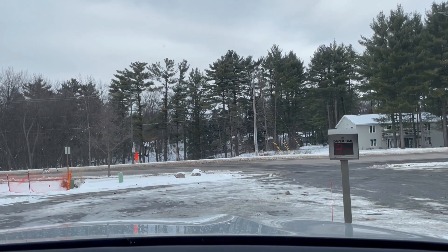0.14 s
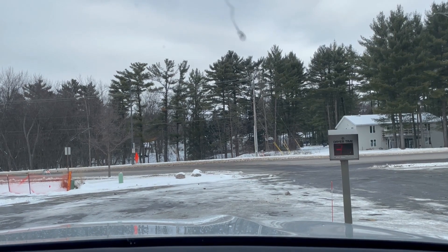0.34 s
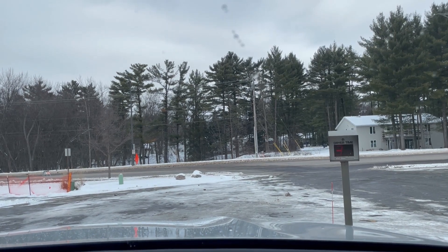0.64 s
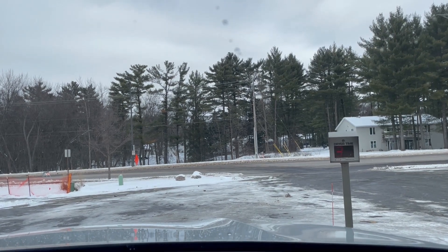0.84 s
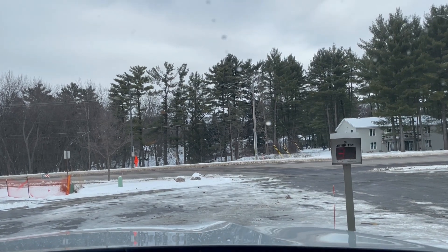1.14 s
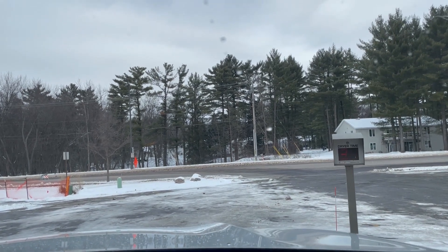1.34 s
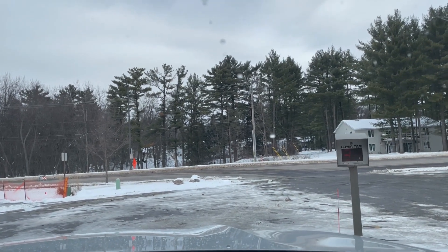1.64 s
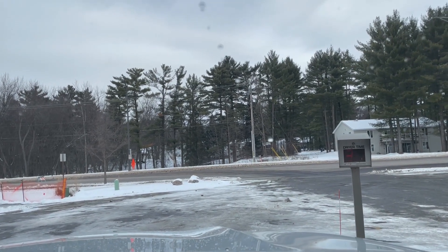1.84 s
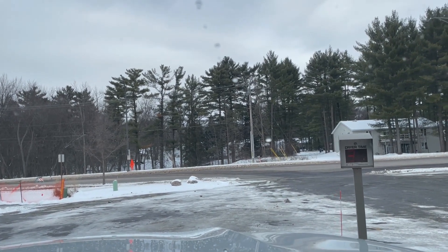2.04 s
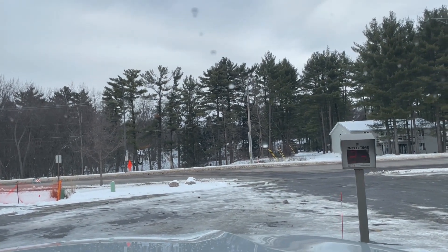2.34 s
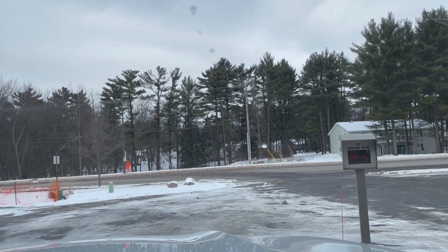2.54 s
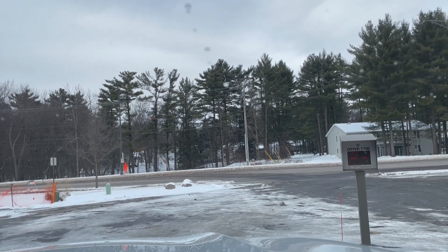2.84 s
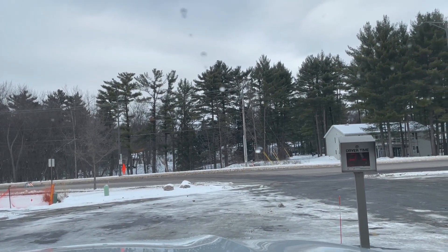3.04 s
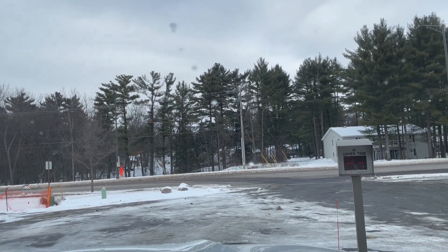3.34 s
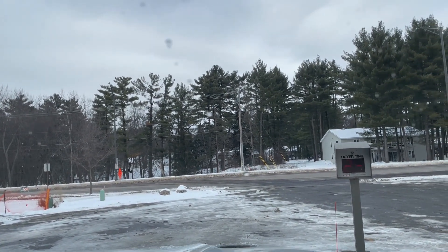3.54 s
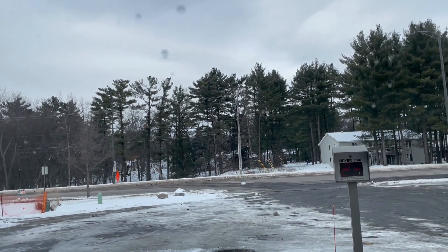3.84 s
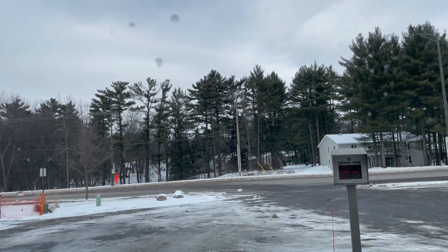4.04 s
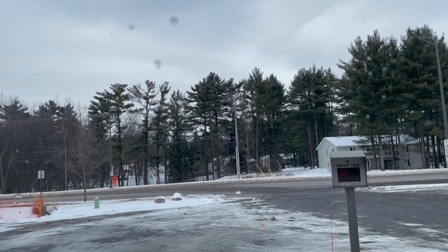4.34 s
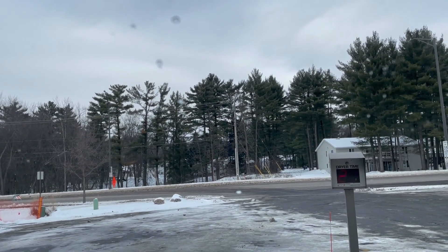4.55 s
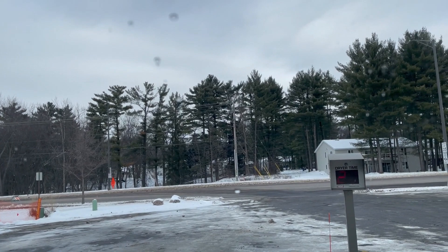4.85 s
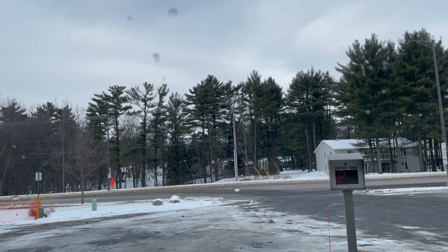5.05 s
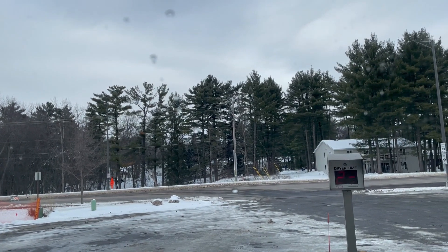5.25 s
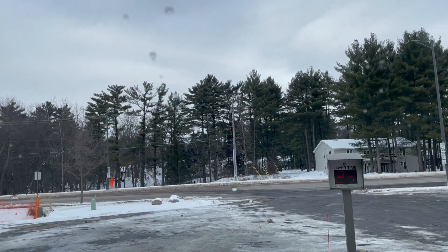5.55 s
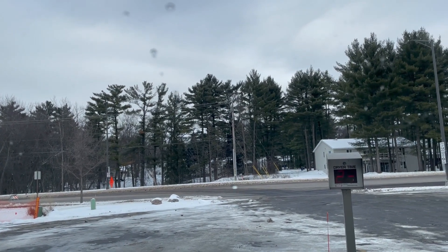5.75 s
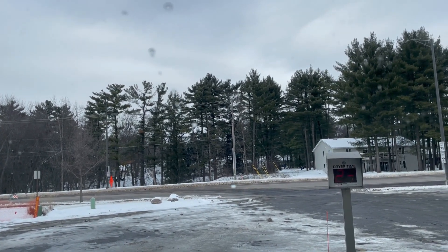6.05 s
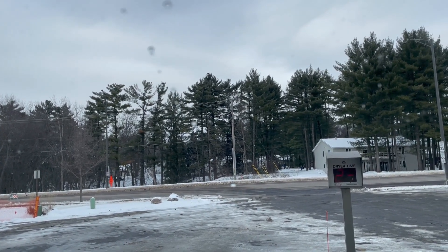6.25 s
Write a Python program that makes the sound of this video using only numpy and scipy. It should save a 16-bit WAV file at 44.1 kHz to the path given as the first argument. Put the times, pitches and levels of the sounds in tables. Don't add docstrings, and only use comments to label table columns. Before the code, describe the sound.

Inside a closed car, powerful dryer blowers pound the body panels into a continuous deep boom, while muffled air roars through roof and glass. The fans' blades sing faintly, wavering and swelling. Fine nylon sleeve swishes come and go close to the phone microphone. The blast is strongest in the first couple of seconds, then eases slightly but never stops.

```python
import sys
import numpy as np
from scipy import signal
from scipy.fft import rfft, irfft, dct, next_fast_len
from scipy.io import wavfile
from scipy.ndimage import uniform_filter1d

SR = 44100
rng = np.random.default_rng(int(sys.argv[2]) if len(sys.argv) > 2 else 0)


def digitize_waveform(pressure):
    field = np.atleast_2d(pressure).T
    bounded = np.clip(field, -1, 1)
    quanta = np.round(bounded * 32767).astype(np.int16)
    wavfile.write(sys.argv[1], SR, quanta)


def volts(x):
    e = np.asarray(x, float) / 20
    return 10 ** e


N = 282681
SIZE = next_fast_len(N)
HZ = np.arange(SIZE // 2 + 1) * SR / SIZE + 1e-3

# time in seconds, level in dB.
BLAST = [(0, -16), (.25, -15.5), (.5, -15), (.8, -15.5), (1.2, -13), (1.7, -14.5), (2.1, -15.5),
         (2.45, -16), (2.66, -18.5), (2.95, -15.5), (3.3, -16.5), (3.7, -16.5), (4.1, -16.5), (4.7, -17),
         (5.3, -16.5), (5.85, -18), (6.02, -16.5), (6.41, -19)]
LAYER_EDGES_HZ = [85, 230, 1200]
PUSH_SHARE = [1.3, 0.94, 0.22, .1]
BUFFET_DB = [0.54, .6, 0.54, .5]
STIFFENING = [0.44, 0.22, 0.42, 0.046]
# frequency in Hz, density in dB per Hz.
PANELS = [(13, -36), (22, -10.5), (49, 1), (107, -2.5), (195, -9), (281, -21.5), (416, -18.5), (560, -30.5),
          (730, -60), (1230, -120)]
# frequency in Hz, density in dB per Hz.
GLASS = [(430, -30.5), (560, -6), (700, -4), (976, -11.5), (1600, -18.5), (2500, -20), (3400, -26),
         (5300, -33), (5600, -37.5), (7200, -41), (8600, -64), (10000, -52.5), (12200, -48), (14000, -55.5),
         (15700, -65)]
# frequency in Hz, density in dB per Hz.
PANELS_SIDE = [(13, -42), (22, -13), (42, 0), (65, -3), (248, -1.5), (288, -2.5), (330, -1), (489, -6.5),
               (530, -8.5), (560, -10), (730, -33.5), (1230, -120)]
# frequency in Hz, density in dB per Hz.
GLASS_SIDE = [(430, -31), (560, -10.5), (640, -1), (853, -13.5), (1300, -18), (1500, -18), (2230, -29),
              (2720, -28.5), (4300, -37.5), (5300, -41.5), (5500, -43.5), (6700, -46.5), (8600, -45.5),
              (11700, -56), (14000, -67)]
# frequency in Hz, width in Hz, common lift in dB, difference lift in dB.
RESONANCES = [(49.4, 18, 3.5, 1), (72.4, 13, 2, -0.5), (89.6, 8.6, -2, 2.5), (108, 20, 2, 4.5),
              (173.6, 6.6, -1.5, 0.5), (193, 16, 1.5, -1), (321, 24, 3.5, -2), (417.7, 34, 4, -0.5),
              (495, 31, 4, 2.5), (534, 21, 2.5, -3.5), (660, 32, 4, 0.5), (680, 30, -2.5, 0.5),
              (772, 40, 3.5, 0.5), (870, 40, 2.5, -0.5), (1270, 51, 4.5, 1.5), (1420, 73, 5.5, -3),
              (1843, 400, 4, 1), (2500, 88, 0, 2), (2750, 200, 1, -2), (3200, 310, 2, 3),
              (5170, 300, 1, 4.5), (5550, 200, -2.5, -0.5)]
# frequency in Hz, in-step part from -1 to 1, quarter-turn part from -1 to 1.
PORT_LINK = [(60, .1, .0), (180, .05, .05), (400, 0.25, .1), (800, 0.21, -.1), (1600, 0.041, -.15),
             (2600, .25, .3), (4600, .45, .42), (5200, .45, .25), (5800, .2, -.35), (7500, .15, -.4),
             (8600, .02, .0), (9800, -.03, .7), (13000, -.02, .75)]
BLADE_TONES = {1: (-51, -50.5, 2.5), 2: (-45, -42.5, 4), 4: (-65, -59.5, 6)}
# peak in seconds, peak level in dB, rise and fall in seconds.
SONG = [(0.28, -38.5, .12), (.5, -39.5, 0.048), (0.91, -40.5, 0.048), (1.25, -45, 0.11), (1.75, -42.5, .35),
        (2.2, -46.5, .3), (2.55, -39, 0.11), (2.9, -44.5, 0.13), (3.96, -46, .3), (4.75, -45.5, .3),
        (5.23, -38, 0.16), (5.6, -44.5, .15), (6.09, -43.5, 0.035), (6.41, -46, 0.042)]
# peak in seconds, peak level in dB, rise in seconds, fall in seconds.
STROKES = [(0.27, -57, .25, .28), (1.4, -67.5, 1.1, 0.83), (3.01, -60, .03, .08), (3.08, -60.5, .04, .04),
           (3.18, -54.5, .05, .05), (3.28, -58, 0.07, 0.14), (3.4, -68, .1, 0.4), (4.55, -69, .35, 0.24),
           (4.69, -59, .11, 0.15), (4.91, -60, 0.058, 0.2), (5.23, -56.5, 0.1, 0.11),
           (5.34, -55.5, 0.12, .1), (5.72, -62, 0.27, .1), (5.98, -59, 0.25, 0.13), (6.1, -67, .1, .25)]
# frequency in Hz, density in dB per Hz.
NYLON = [(2000, -25), (3400, -2), (5000, -0.5), (6900, -2.5), (7700, -8), (8600, -12), (9600, -5.5),
         (11000, -3), (12400, -1.5), (13800, -2.5), (15200, -6), (16000, -17.5)]
# frequency in Hz, density in dB per Hz.
NYLON_SIDE = [(2000, -21.5), (3400, -2.5), (5000, -6.5), (6900, -6), (8600, -0.5), (10300, -4.5),
              (12400, -8.5), (14000, -14), (16000, -23.5)]
# frequency in Hz, common level in dB,
# difference level in dB.
FAINTEST = [(1000, -64, -70.5), (3000, -72, -71), (5500, -68, -66.5), (6600, -65.5, -67.5),
            (7600, -62, -70), (8000, -61.5, -68.5), (9600, -61, -65), (9800, -66, -67.5),
            (12000, -69.5, -64.5), (13100, -66.5, -53.5), (14900, -61, -40), (15700, -59, -40)]
# frequency in Hz, extra level in dB needed to be kept.
STARVED = [(7200, 0), (7900, 8), (9300, 7.5), (10000, 3), (10700, -2), (14100, -1), (14800, 4.5),
           (15500, 5)]

PANELS_DB, GLASS_DB = -16.5, -40
PANELS_SIDE_DB, GLASS_SIDE_DB = -32.5, -36.5
BUFFETS_PER_S = 12
BLADE_HZ, SONG_REST_DB, SONG_USUAL_DB = 308.3, -53.5, -48
WHINE_HZ, WHINE_DB = 12048, -82
SLEEVE_DB, SLEEVE_SIDE_DB, SLEEVE_REST_DB = 3.5, 4.5, -76
BODY_HZ, RUB_BODY_DB = 7600, -2
ROUNDNESS = 1.7
LOW_CUT_HZ = 33.7
HOP, GRID = 1024, 250
LOST_COMMON_HZ, LOST_SIDE_HZ = (8270, 8960), (13090, 22050)
BAND_DROP_DB, STARVE_JITTER_DB = -7, 2.5
KEEP_JITTER_DB, KEEP_FOLLOWS = 5.5, 0.29


def shape(table):
    hz, db = np.transpose(table)
    gain = volts(np.interp(np.log(HZ), np.log(hz), db, left=-200, right=-200))
    return gain / np.sqrt(np.mean(gain ** 2))


def walk(rate):
    k = int(SR / rate)
    steps = np.repeat(rng.standard_normal(N // k + 1), k)
    return 1.3 * uniform_filter1d(uniform_filter1d(steps, k), k)[:N]


def swells_db(table, rest_db):
    t = np.arange(N) / SR
    power = volts(2 * rest_db)
    for peak_s, peak_db, *lengths in table:
        before = (peak_s - t) / max(lengths[0], 1e-3)
        after = (t - peak_s) / max(lengths[-1], 1e-3)
        away = np.where(t < peak_s, before, after)
        power = power + volts(2 * (peak_db - 10 * away ** ROUNDNESS))
    return 10 * np.log10(power)


def ports(common_gain, differ_gain, envelope=1):
    hz, in_step, quarter = np.transpose(PORT_LINK)
    link = np.interp(np.log(HZ), np.log(hz), in_step + 1j * quarter)
    first, second = (rfft(envelope * rng.standard_normal(N), SIZE) for _ in range(2))
    free = np.sqrt(np.clip(1 - abs(link) ** 2, 0, 1))
    common = first * common_gain
    differ = (link * first + free * second) * differ_gain
    return np.array([common + differ, common - differ])


def cabin(column):
    return volts(sum(row[column] / (1 + (2 * (HZ - row[0]) / row[1]) ** 2) for row in RESONANCES))


def jets():
    through = np.hypot(volts(PANELS_DB) * shape(PANELS), volts(GLASS_DB) * shape(GLASS))
    through_side = np.hypot(volts(PANELS_SIDE_DB) * shape(PANELS_SIDE), volts(GLASS_SIDE_DB) * shape(GLASS_SIDE))
    air = ports(cabin(column=2) * through, cabin(column=3) * through_side)
    push = np.interp(np.arange(N) / SR, *np.transpose(BLAST))
    push = push - push.mean()
    swells = [share * push + depth_db * walk(BUFFETS_PER_S) for share, depth_db in zip(PUSH_SHARE, BUFFET_DB)]
    place = 2 * np.log2(HZ / 20)
    out = 0
    for k in range(21):
        layer = np.searchsorted(LAYER_EDGES_HZ, 20 * 2 ** (k / 2))
        window = np.cos(np.pi / 2 * np.clip(place - k, -1, 1)) ** 2
        band = irfft(air * window, SIZE)[:, :N]
        swing = uniform_filter1d(np.sum(band ** 2, axis=0), int(0.065 * SR))
        even = (swing / swing.mean() + .05) ** (-STIFFENING[layer] / 2)
        flutter_db = .5 * walk(9) + .5 * walk(2.51)
        out = out + volts(swells[layer] + flutter_db) * even * band
    return out


def blades():
    out = 0
    for multiple, (common_db, differ_db, spread_hz) in BLADE_TONES.items():
        for fan, share in ((-1, 0.2), (0, 0.97), (1.0, 0.51)):
            tone_hz = multiple * BLADE_HZ + spread_hz * (fan + 0.351 * walk(7))
            phase = 2 * np.pi * np.cumsum(tone_hz) / SR
            start = rng.uniform(0, 2 * np.pi, 2)
            common = volts(common_db + 0.84 * walk(9.6)) * np.sin(phase + start[0])
            differ = volts(differ_db + 3 * walk(4)) * np.sin(phase + start[1])
            out = out + share * np.array([common + differ, common - differ])
    return out * volts(swells_db(SONG, SONG_REST_DB) - SONG_USUAL_DB)


def electronics():
    phase = 2 * np.pi * np.cumsum(WHINE_HZ + 4 * walk(15)) / SR
    whine = volts(WHINE_DB + 1.5 * walk(8)) * np.sin(phase)
    return whine * np.array([[1.4], [.6]])


def sleeve():
    level_db = swells_db(STROKES, SLEEVE_REST_DB)
    grain = volts(level_db + .6 * walk(30) + 0.82 * walk(400))
    hiss = ports(volts(SLEEVE_DB) * shape(NYLON), volts(SLEEVE_SIDE_DB) * shape(NYLON_SIDE), grain)
    body = irfft(hiss / (1 + (HZ / BODY_HZ) ** 8), SIZE)[:, :N]
    return irfft(hiss, SIZE)[:, :N] + (volts(RUB_BODY_DB) - 1) * body


def scene():
    return jets() + blades() + electronics() + sleeve()


def thin_out(x, keep_db, lost_hz, line_hz):
    padded = np.pad(x, (HOP - GRID, 3 * HOP - (N + HOP - GRID) % HOP), "reflect")
    blocks, half = padded.reshape(-1, HOP), HOP // 2
    rise = np.sin(np.pi * (np.arange(HOP) + .5) / (2 * HOP))
    a, b = blocks[:-1] * rise, blocks[1:] * rise[::-1]
    folded = np.hstack([-b[:, half - 1::-1] - b[:, half:], a[:, :half] - a[:, :half - 1:-1]])
    lines = dct(folded, type=4, norm="ortho")
    bands = (lines / volts(keep_db)).reshape(-1, 32, 32)
    over = np.sqrt(np.mean(bands ** 2, axis=2)) + 1e-9
    bar = volts(KEEP_JITTER_DB * rng.standard_normal(over.shape)) * np.maximum(over, 1) ** KEEP_FOLLOWS
    starved_db = np.interp(line_hz[16::32], *np.transpose(STARVED))
    drop_db = BAND_DROP_DB + starved_db + STARVE_JITTER_DB * rng.standard_normal(over.shape)
    bar = np.where(over > bar * volts(drop_db), bar, np.inf)
    kept = abs(lines) > volts(keep_db) * np.repeat(bar, 32, axis=1)
    outside = (line_hz < lost_hz[0]) | (line_hz > lost_hz[1])
    back = dct(lines * kept * outside, type=4, norm="ortho")
    low, high = back[:, :half], back[:, half:]
    out = np.zeros_like(blocks)
    out[:-1] += np.hstack([high, -high[:, ::-1]]) * rise
    out[1:] -= np.hstack([low[:, ::-1], low]) * rise[::-1]
    return out.ravel()[HOP - GRID:][:N]


def band_limit(x):
    return signal.sosfilt(signal.butter(12, 15620, fs=SR, output="sos"), x)


def record(dry):
    running = np.pad(dry, ((0, 0), (SR // 4, 0)), "reflect")
    bass_cut = signal.butter(6, LOW_CUT_HZ, "high", fs=SR, output="sos")
    heard = signal.sosfilt(bass_cut, running)[:, -N:]
    envelope = np.sqrt(uniform_filter1d(np.mean(heard ** 2, axis=0), int(0.023 * SR)) + 1e-9)
    gain = np.minimum(1, 0.18 / envelope) ** 0.16
    held = np.tanh(0.69 * heard * gain) / 0.71
    hz, common_db, differ_db = np.transpose(FAINTEST)
    line_hz = (np.arange(HOP) + .5) * SR / (2 * HOP)
    common_keep_db = np.interp(line_hz, hz, common_db)
    differ_keep_db = np.interp(line_hz, hz, differ_db)
    common = thin_out((held[0] + held[1]) / 2, common_keep_db, LOST_COMMON_HZ, line_hz)
    differ = thin_out((held[0] - held[1]) / 2, differ_keep_db, LOST_SIDE_HZ, line_hz)
    fade = np.minimum(np.arange(N)[::-1] / (SR / 200), 1)
    return band_limit(fade * np.array([common + differ, common - differ]))


dry = scene()
out = record(dry)
digitize_waveform(out)
```